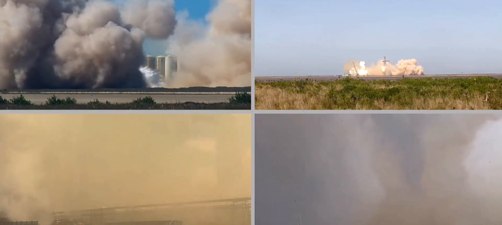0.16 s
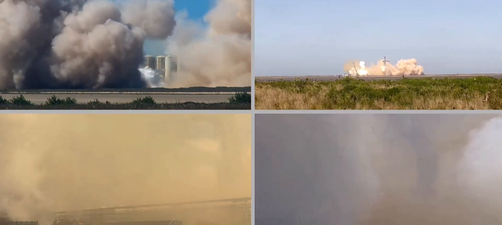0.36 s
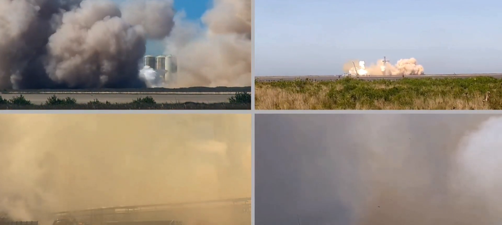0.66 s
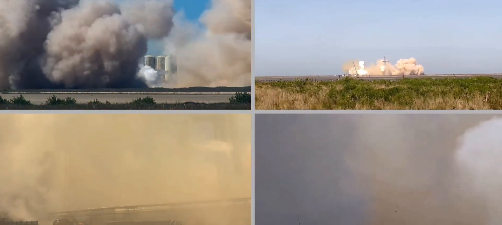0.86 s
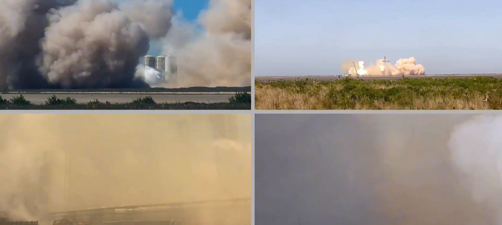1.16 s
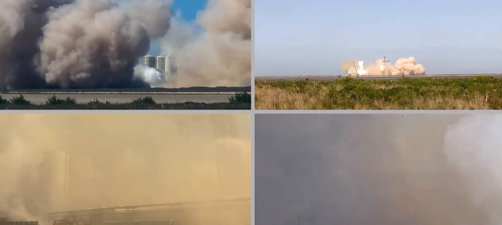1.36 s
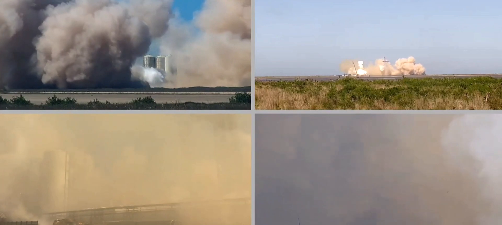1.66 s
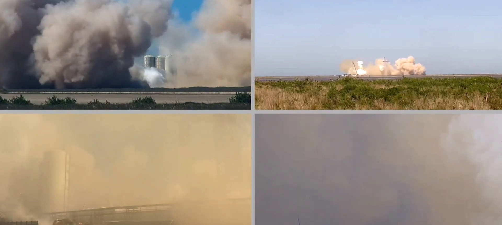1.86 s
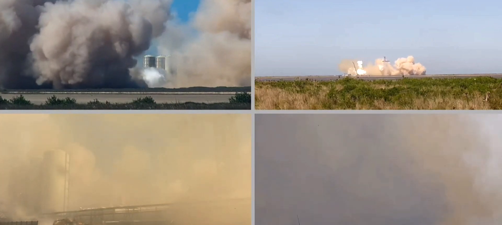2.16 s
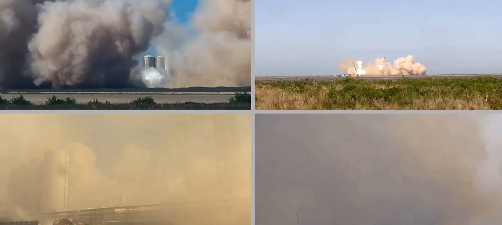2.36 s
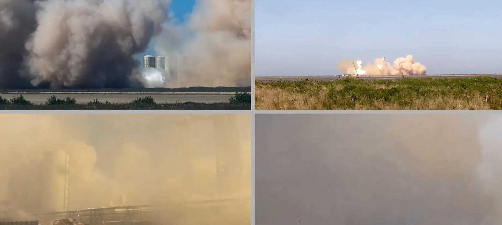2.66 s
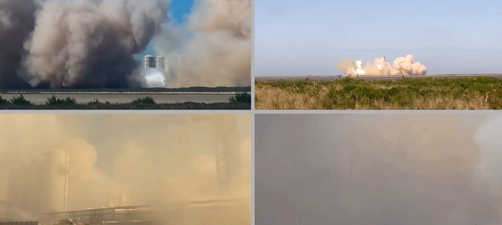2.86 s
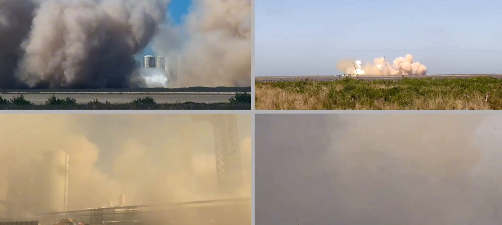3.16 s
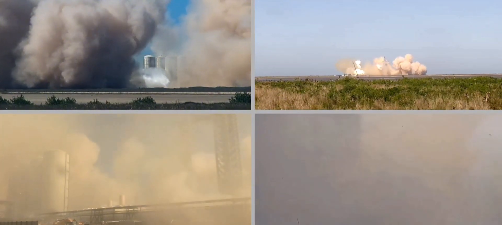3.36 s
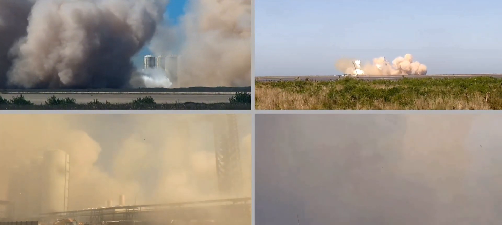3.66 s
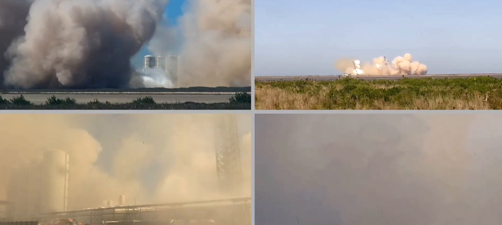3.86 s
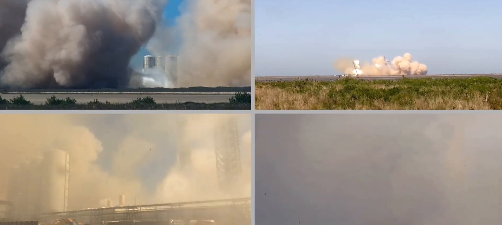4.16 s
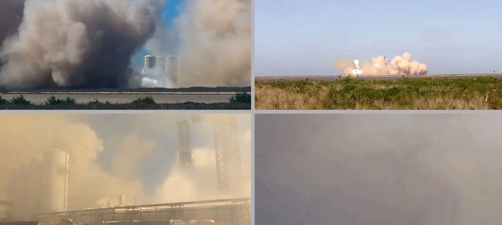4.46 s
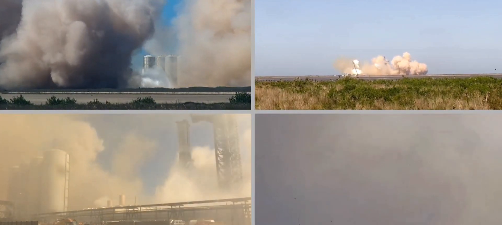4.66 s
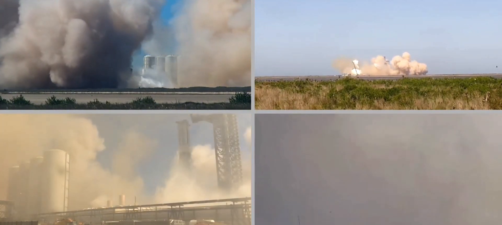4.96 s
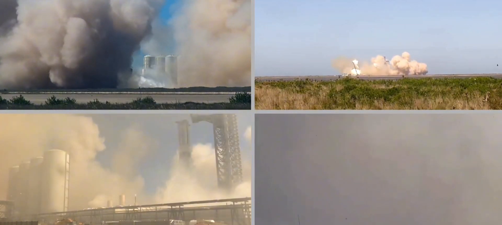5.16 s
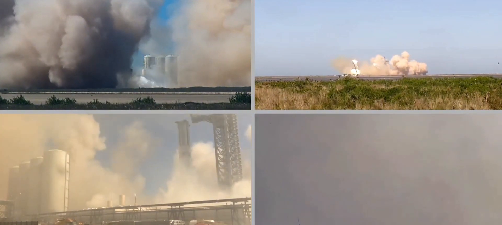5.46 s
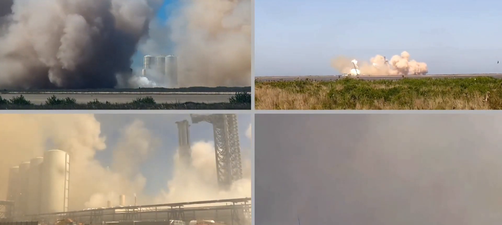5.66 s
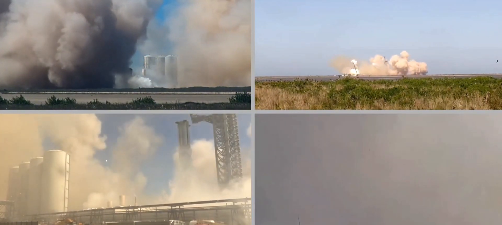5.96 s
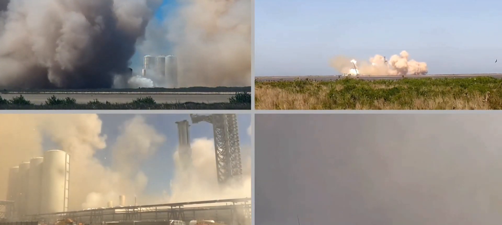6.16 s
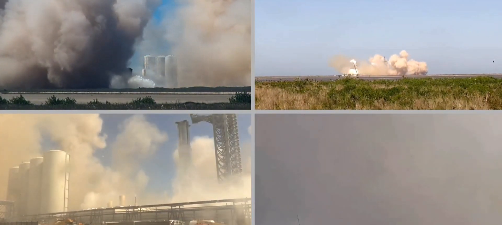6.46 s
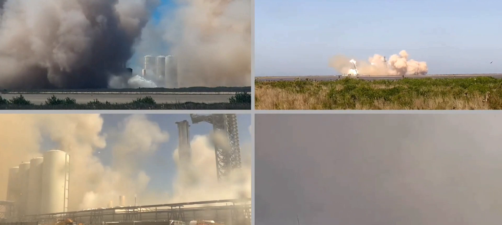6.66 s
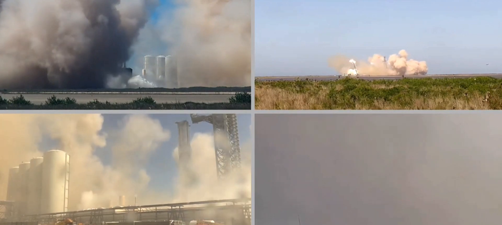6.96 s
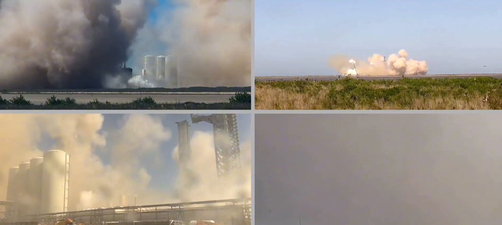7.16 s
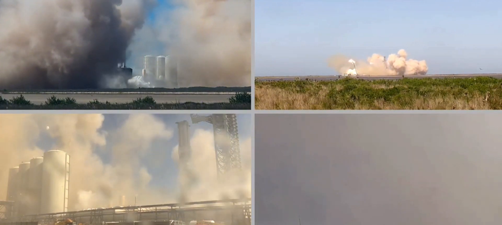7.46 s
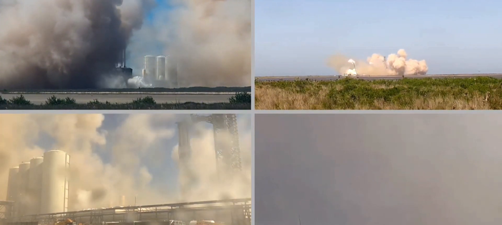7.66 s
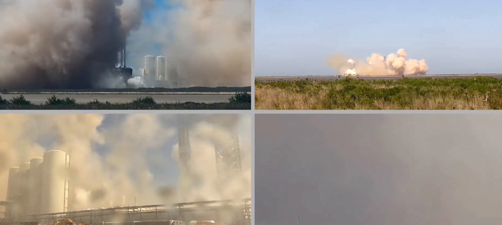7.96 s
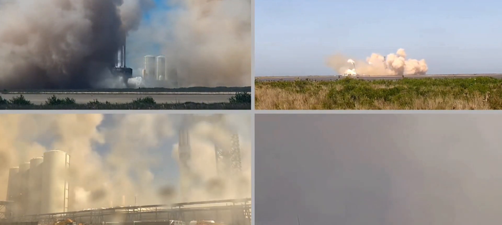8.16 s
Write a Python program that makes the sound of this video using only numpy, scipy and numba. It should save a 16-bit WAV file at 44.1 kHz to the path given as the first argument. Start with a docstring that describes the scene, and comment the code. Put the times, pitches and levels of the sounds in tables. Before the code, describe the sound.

From 0 s, many rocket engines fire together on a stand in open flat land, an immense continuous broadband roar with heavy bass, overloading the microphone into dense, rough crackle and tearing distortion. From about 1.25 s they throttle down: the deep bass drops away, the strongest tone of the noise slides upward, and the roar weakens slightly, still harshly clipped. At about 2.2 s the engines shut off abruptly; a few sharp snaps pop until about 2.35 s while the blast dies quickly. What remains is far quieter and duller: a turbulent rush of venting gas and water, dipping near 2.5 s, then swelling to about 3.8 s, with a soft airy hiss building on top. Beneath it a deep rumble settles over the plain. The roar continues fairly steadily, fluttering slightly with tiny dips near 4.4, 6 and 7.5 s, then eases towards 8.3 s.

```python
"""A cluster of rocket engines fires on its stand at full thrust: a jet so loud that it overloads a microphone amplifier.
It throttles from 1.25 s, losing deep bass while its peak slides upward, and shuts off at 2.22 s; a few crests still snap.
Then venting gas and water roar on the pad, a hiss builds up, and a deep rumble over the plain settles.
Sources are shaped noise; the amplifier has two rails, with a snap on the positive side, and a rough noise is
heard around the overloads."""
import sys
import numpy as np
from scipy import signal
from scipy.fft import rfft, irfft, next_fast_len
from scipy.io import wavfile
from scipy.ndimage import uniform_filter1d, map_coordinates
from numba import njit

SR = 44100
rng = np.random.default_rng(int(sys.argv[2]) if len(sys.argv) > 2 else 0)


def to_wav(s):
    """Save 16-bit WAV."""
    ch = np.atleast_2d(s).T  # columns
    pcm = np.round(np.clip(ch, -1, 1) * 32767)  # PCM
    wavfile.write(sys.argv[1], SR, pcm.astype(np.int16))


N = 366030
SHUTOFF_S = 2.222


def amp(db):
    """Amplitude factor of a level in dB."""
    return 10 ** (np.asarray(db) / 20)


def unit(x):
    """x scaled to rms 1."""
    return x / np.sqrt(np.mean(x ** 2) + 1e-20)


def ramp(start_s, length_s):
    """0 before the start, rising linearly to 1 over the length."""
    return np.clip((np.arange(N) / SR - start_s) / length_s, 0, 1)


def since(start_s):
    """Seconds gone by since the start, 0 before it."""
    return np.maximum(np.arange(N) / SR - start_s, 0)


def curve(rows):
    """One value per sample, linear between rows of time and value."""
    times_s, values = np.transpose(rows)
    return np.interp(np.arange(N) / SR, times_s, values)


def wobble(knots_per_s):
    """A smooth random curve through normally distributed knots."""
    knots = rng.standard_normal(int(N * knots_per_s / SR) + 4)
    return map_coordinates(knots, [np.arange(N) * knots_per_s / SR])


def filtered(x, response):
    """x with its spectrum multiplied by a response of frequency in Hz."""
    size = next_fast_len(N + 8192)
    hz = np.fft.rfftfreq(size, 1 / SR)
    return irfft(rfft(x, size) * response(hz), size)[:N]


def rush(spectrum, patchy_db):
    """Turbulent noise of rms 1: patches of random gain in time and frequency, then a spectrum."""
    cells = signal.stft(rng.standard_normal(N), nperseg=512)[2]
    field = uniform_filter1d(rng.standard_normal(cells.shape), 8, axis=0)
    field = uniform_filter1d(field, 8, axis=1)
    patchy = signal.istft(cells * amp(patchy_db * unit(field)), nperseg=512)[1][:N]
    f_hz, density_db = np.transpose(spectrum)

    def response(hz):
        # straight lines over log frequency
        return amp(np.interp(np.log(hz + 1), np.log(f_hz + 1), density_db, -120, -120))

    return unit(filtered(patchy, response))


# Spectrum of the deep rumble. Each row: frequency in Hz, relative density in dB per Hz.
RUMBLE_SPECTRUM = [(5.9, -51), (10, -24), (43, -7), (86, -9), (146, 0), (170, -2), (220, -23), (370, -120)]


def rumble():
    """Deep rumble over the plain: its excess decays exponentially after shut-off to a lasting level."""
    lasting_db, excess_db, settle_s = -38.5, 9.5, .6
    level_db = lasting_db + excess_db * np.exp(-since(SHUTOFF_S) / settle_s) + 1.7 * wobble(2.0)
    return amp(level_db) * rush(RUMBLE_SPECTRUM, patchy_db=1.1)


# Spectra of the roar and the hiss. Each row: frequency in Hz, relative density in dB per Hz.
ROAR_SPECTRUM = [(53, -47), (90, -13), (152, -7), (235, -2.5), (310, -3), (346, -2.5), (425, -2), (687, -2),
                 (833, -6.5), (983, -6), (1950, -23), (2400, -23), (3120, -51), (5280, -120)]
HISS_SPECTRUM = [(1000, -33), (1700, -9), (1950, -13.5), (2350, -7.5), (2700, -6), (3150, -6.5),
                 (3500, -13), (4350, -15.5), (5000, -25.5), (5950, -39.5), (7500, -51.5), (9500, -72),
                 (12000, -100)]
# Levels of the roar and the hiss before dips and surges. Each row: time in seconds, level in dB.
ROAR_LEVEL = [(2.3, -22.5), (2.55, -28.5), (2.9, -25.5), (3.8, -22), (4.5, -23.5), (5.6, -23.5),
              (6.4, -23.5), (7.2, -23.5), (7.4, -24.5), (8.3, -28.5)]
HISS_LEVEL = [(2.3, -51), (2.55, -60), (2.85, -47.5), (3.4, -43.5), (3.9, -42), (4.4, -45), (5.6, -45),
              (7.3, -43), (8.3, -46.5)]
# Brief dips of the roar. Each row: centre in seconds, depth in dB.
ROAR_DIPS = [(4.41, 0.5), (5.99, 3), (7.5, 2)]


def venting():
    """Turbulent venting of gas and water: roar and hiss surge together, the hiss less."""
    t = np.arange(N) / SR
    dip_width_s = 0.018
    dips_db = sum(depth_db * np.exp(-((t - s) / dip_width_s) ** 2) for s, depth_db in ROAR_DIPS)
    surge_db = 0.17 * wobble(8.9) + .5 * wobble(45) + 0.39 * wobble(220)
    roar_db = curve(ROAR_LEVEL) - dips_db + surge_db
    hiss_db = curve(HISS_LEVEL) + 0.44 * surge_db
    roar = amp(roar_db) * rush(ROAR_SPECTRUM, patchy_db=0.65)
    hiss = amp(hiss_db) * rush(HISS_SPECTRUM, patchy_db=0.2)
    return roar + hiss


# The last pressure crests that still reach the upper rail. Each entry: time in seconds.
CREST_TIMES = [2.2462, 2.2538, 2.281, 2.287, 2.292, 2.301, 2.3375]


def last_crests():
    """Pressure crests flanked by two troughs each, so that they move no net air."""
    width_ms, push = 1.3, .66
    t = np.arange(N) / SR
    squares = [((t - s) * 1000 / width_ms) ** 2 for s in CREST_TIMES]
    return push * sum((1 - 2 * u) * np.exp(-u) for u in squares)


# Jet noise at full, half-throttled and throttled thrust.
# Each row: frequency in Hz, relative density in dB per Hz.
FULL_SPECTRUM = [(8, -27), (20, -3.5), (60, -7), (130, 0.5), (250, -6.5), (500, -10), (800, -13),
                 (1500, -24), (3000, -32.5), (4600, -40), (6500, -66.5), (10000, -100)]
HALF_SPECTRUM = [(8, -27.5), (20, -13), (60, -9.5), (110, -7), (180, 1.5), (240, -1.5), (330, -10.5),
                 (600, -7.5), (1000, -15), (1900, -29.5), (3000, -31.5), (4500, -44), (6500, -69.5),
                 (10000, -100)]
THROTTLED_SPECTRUM = [(8, -38), (20, -15), (70, -14.5), (120, -9), (180, -4.5), (235, -0.5), (300, -2.5),
                      (370, -11.5), (600, -9), (1000, -17.5), (1900, -32), (3000, -33.5), (4400, -45),
                      (6500, -72.5), (10000, -100)]


def jet():
    """Mixing noise of the plumes; throttling drops the deep bass and slides the peak upward."""
    sag_db_per_s = 1.38
    throttle_s, throttle_ramp_s, throttle_loss_db = 1.25, .65, 5
    shutoff_ramp_s, shutoff_loss_db = .015, 7.5
    tailoff_db, tailoff_s, dying_db_per_s = 7, 0.11, 5.5

    t = np.arange(N) / SR
    off_s = since(SHUTOFF_S)
    throttled = ramp(throttle_s, throttle_ramp_s)
    level_db = -sag_db_per_s * np.minimum(t, SHUTOFF_S) - throttle_loss_db * throttled
    level_db -= shutoff_loss_db * ramp(SHUTOFF_S, shutoff_ramp_s)
    level_db -= tailoff_db * (1 - np.exp(-off_s / tailoff_s)) + dying_db_per_s * off_s
    level_db += 0.51 * wobble(12)

    # equal-power crossfade through the three spectra
    mix = np.zeros(N)
    for at, spectrum in [(0, FULL_SPECTRUM), (.5, HALF_SPECTRUM), (1, THROTTLED_SPECTRUM)]:
        share = np.clip(1 - 2 * np.abs(throttled - at), 0, 1)
        mix += np.sqrt(share) * rush(spectrum, patchy_db=1.5)
    return amp(level_db) * mix


def scene():
    """Sound at the microphone, one channel."""
    return (rumble() + venting() + last_crests() + jet())[None]


@njit
def amplifier(x, low, knee, snap, steep, high, leak, servo):
    """Soft lower rail, a jump to the upper rail, and a bias that drifts until the output averages zero."""
    y = np.zeros(len(x))
    bias = -0.15
    for i in range(len(x)):
        v = x[i] + bias
        if v < 0:
            out = v / (1 + (-v / low) ** knee) ** (1 / knee)
        else:
            out = min(v + steep * max(v - snap, 0.0), high)
        # a little of what the rails change leaks through
        y[i] = out + leak * np.tanh(v - out)
        bias -= servo * y[i]
    return y


# Spectrum of the rough noise around the overloads.
# Each row: frequency in Hz, relative density in dB per Hz.
ROUGH_SPECTRUM = [(60, -11), (300, -0.5), (1500, -12), (4000, -20), (8000, -32), (16000, -35.5)]


def rough_noise(wired):
    """Noise that follows the share of time near the upper rail, spread around each overload."""
    smooth_samples = 500
    pinned = uniform_filter1d(1. * (wired > .42), smooth_samples)
    pinned = np.abs(uniform_filter1d(pinned, smooth_samples))  # no negative rounding residue
    return amp(-26) * pinned ** .45 * rush(ROUGH_SPECTRUM, patchy_db=3.0)


def record(dry):
    """Overloading amplifier, a rough noise around the overloads, a faint hiss and a sharp upper band limit."""
    servo_hz, self_noise_db, top_hz = 3, -80.5, 15880
    wired = amplifier(dry[0], low=0.26, knee=24.0, snap=0.34, steep=30., high=.45, leak=.06,
                      servo=2 * np.pi * servo_hz / SR)
    rough = rough_noise(wired)
    hiss = amp(self_noise_db) * rng.standard_normal(N)
    return filtered(wired + rough + hiss, lambda hz: hz < top_hz)[None]


dry = scene()
out = record(dry)
to_wav(out)
```